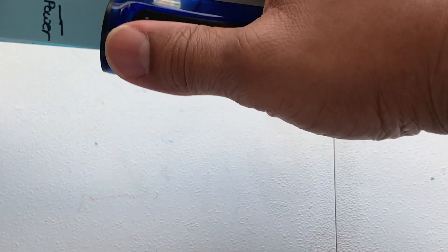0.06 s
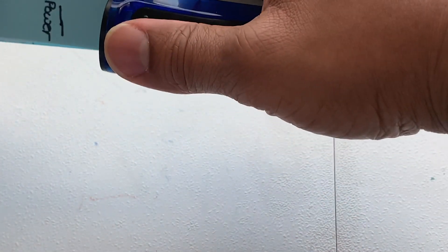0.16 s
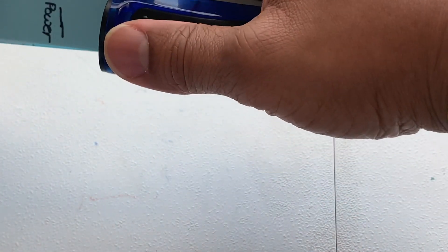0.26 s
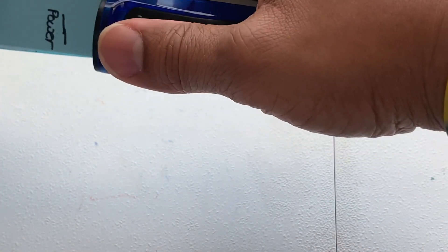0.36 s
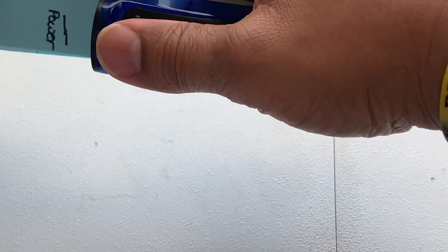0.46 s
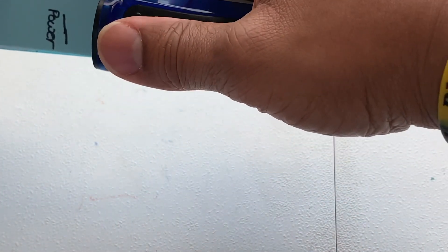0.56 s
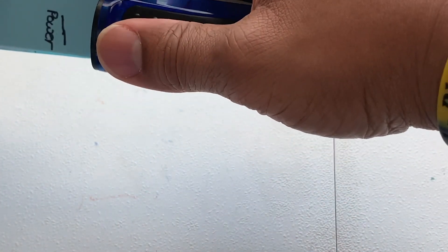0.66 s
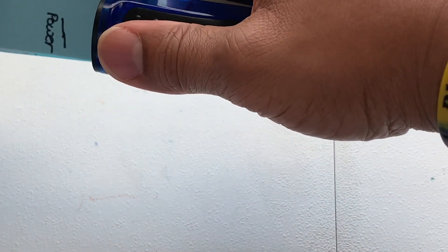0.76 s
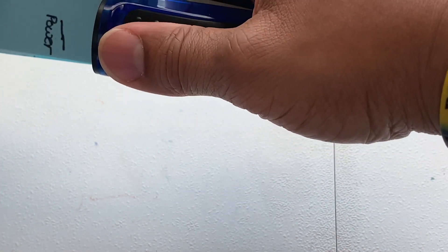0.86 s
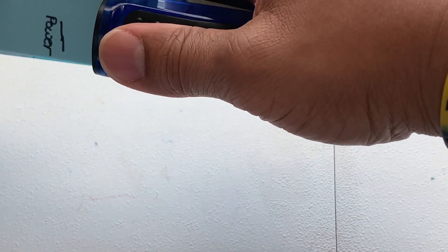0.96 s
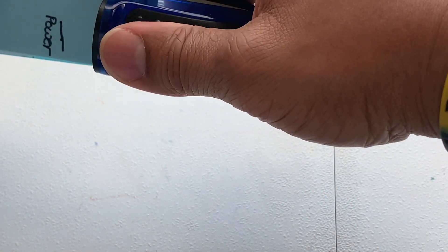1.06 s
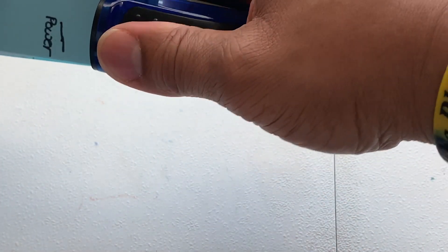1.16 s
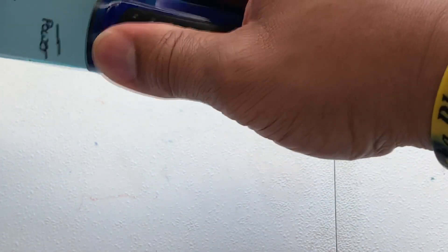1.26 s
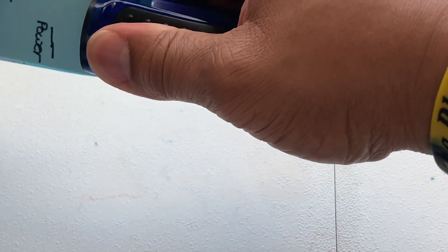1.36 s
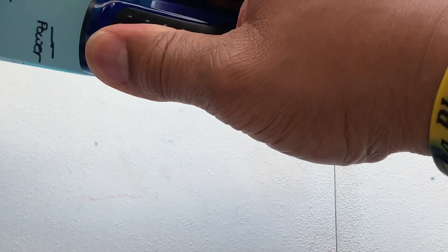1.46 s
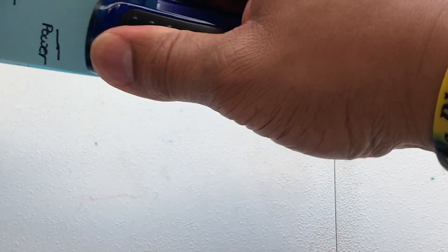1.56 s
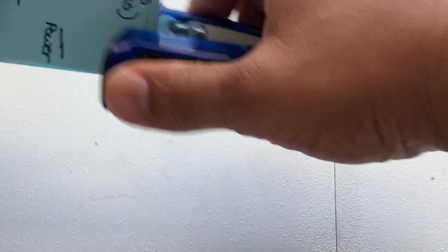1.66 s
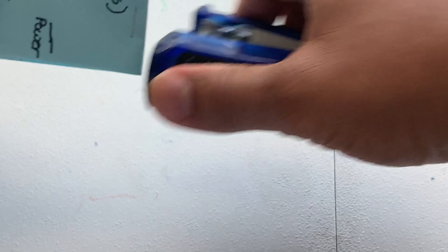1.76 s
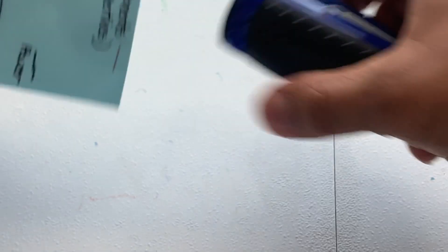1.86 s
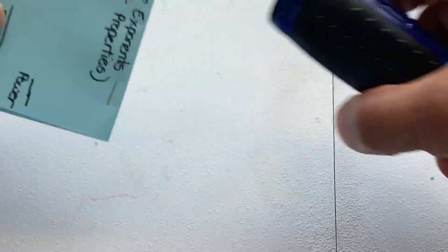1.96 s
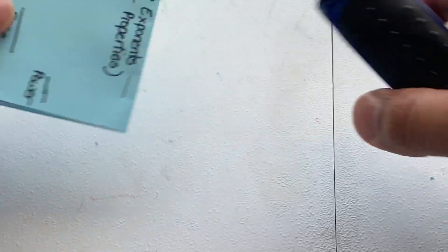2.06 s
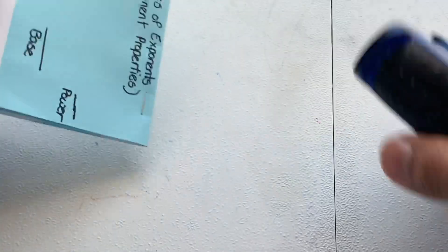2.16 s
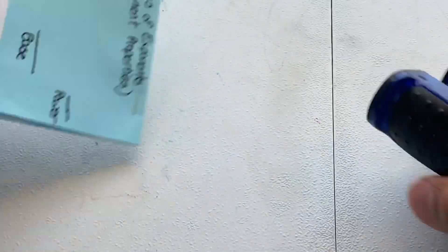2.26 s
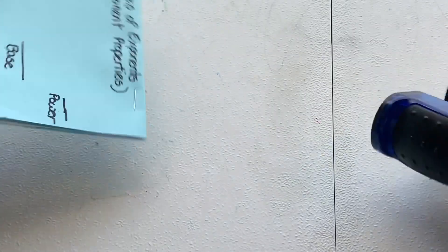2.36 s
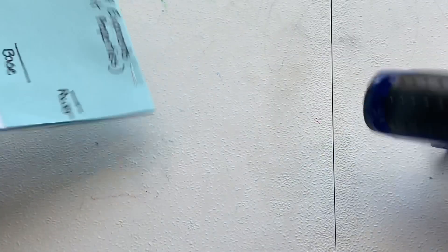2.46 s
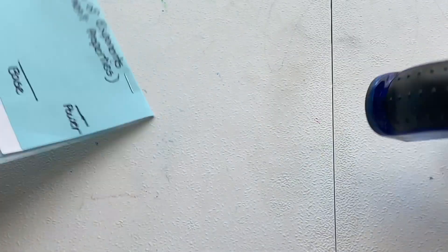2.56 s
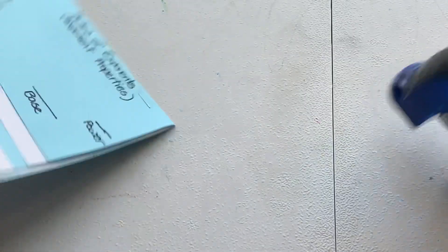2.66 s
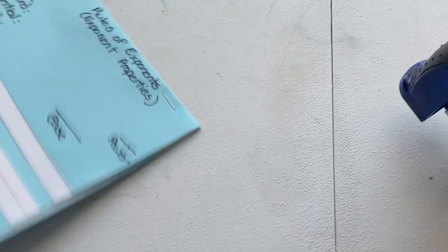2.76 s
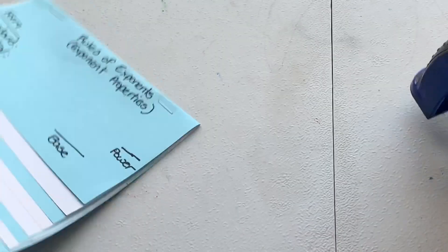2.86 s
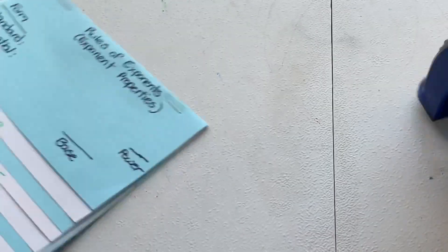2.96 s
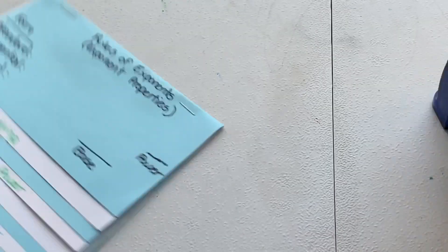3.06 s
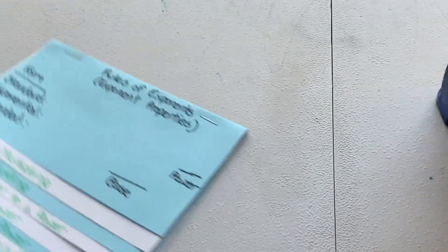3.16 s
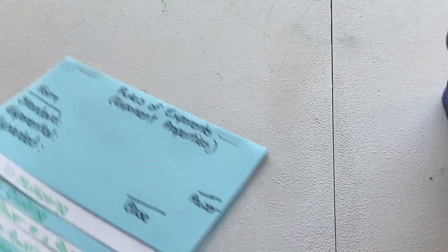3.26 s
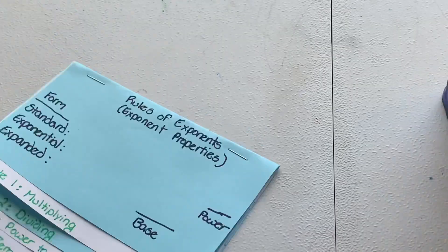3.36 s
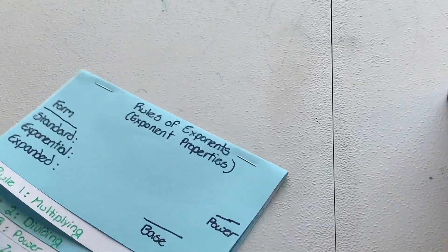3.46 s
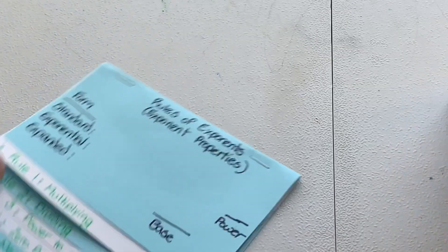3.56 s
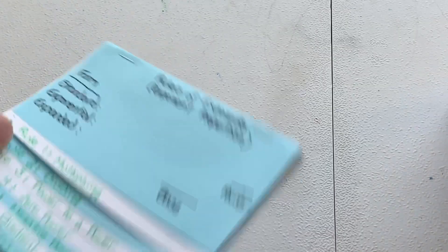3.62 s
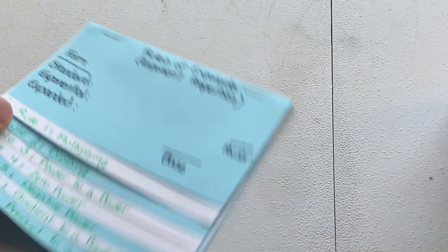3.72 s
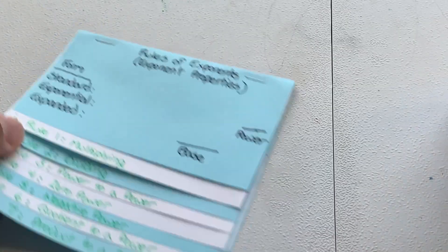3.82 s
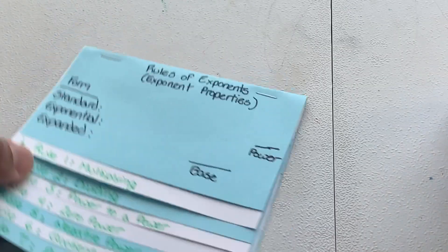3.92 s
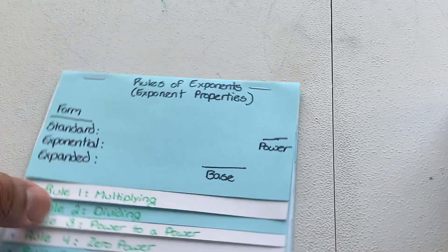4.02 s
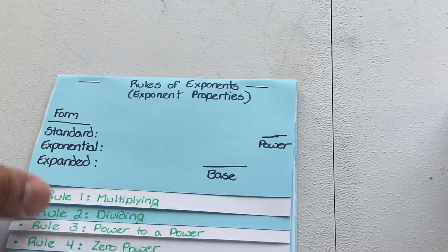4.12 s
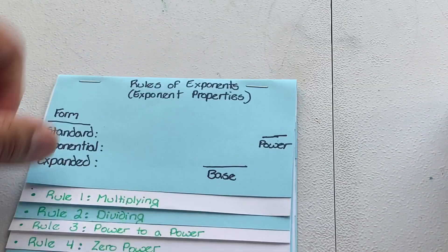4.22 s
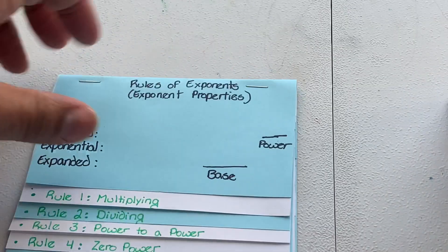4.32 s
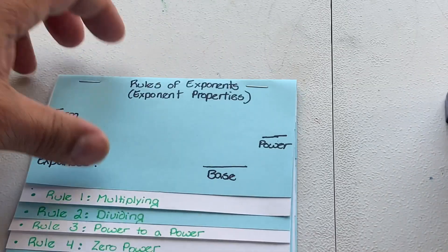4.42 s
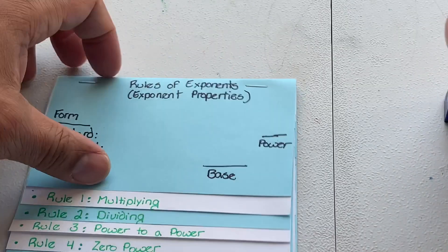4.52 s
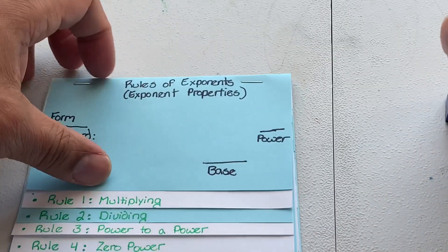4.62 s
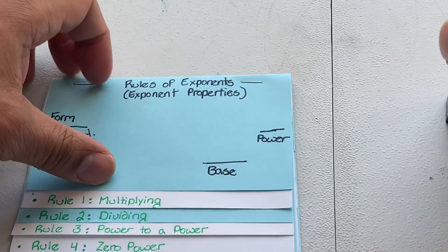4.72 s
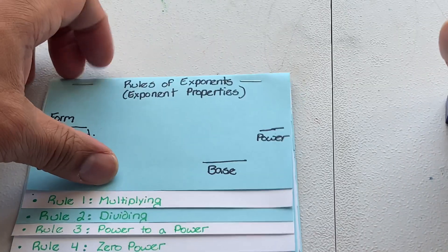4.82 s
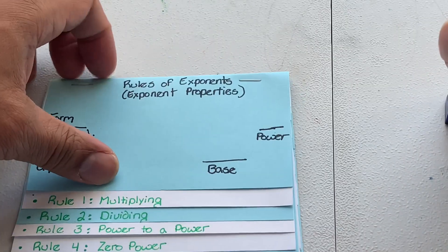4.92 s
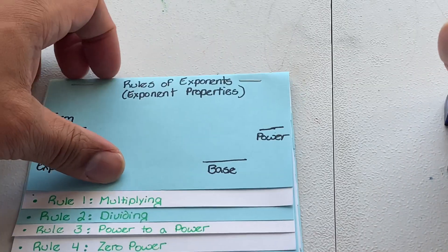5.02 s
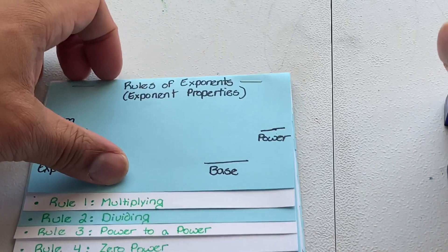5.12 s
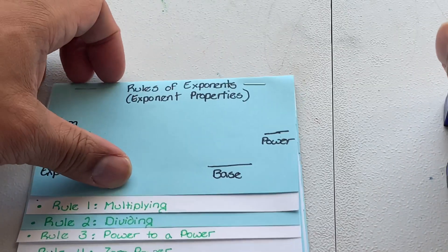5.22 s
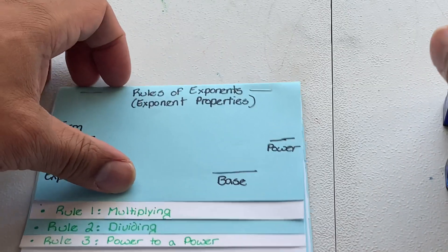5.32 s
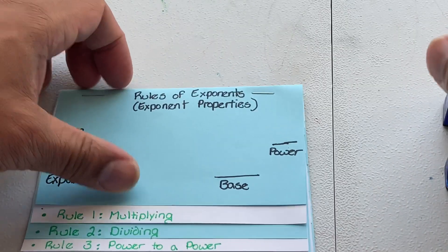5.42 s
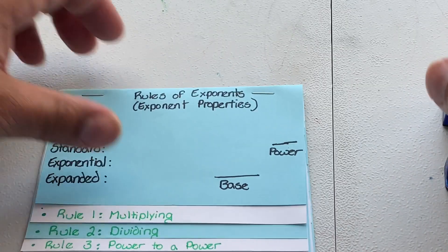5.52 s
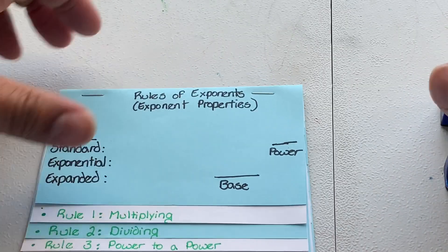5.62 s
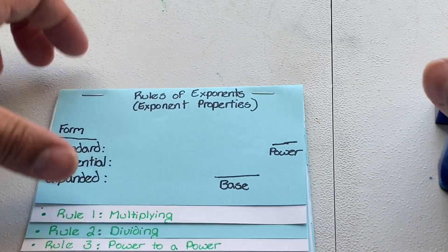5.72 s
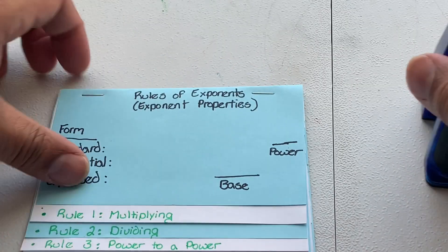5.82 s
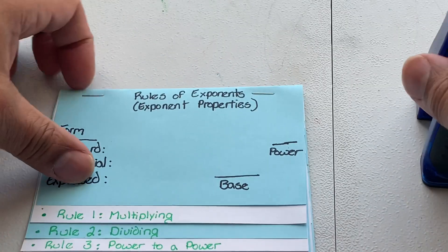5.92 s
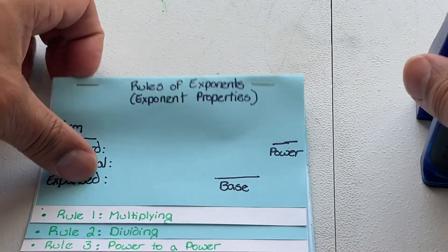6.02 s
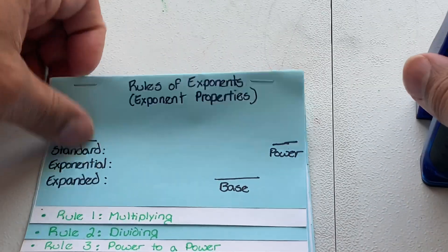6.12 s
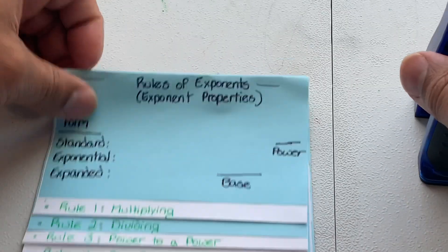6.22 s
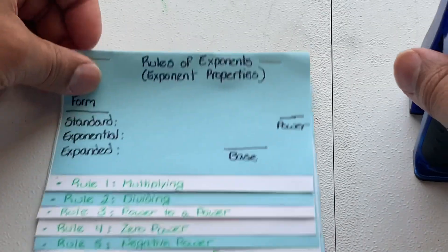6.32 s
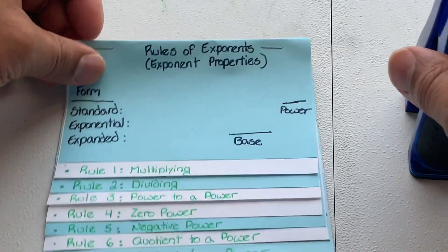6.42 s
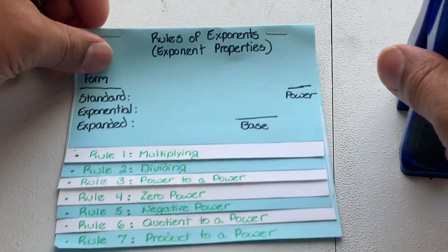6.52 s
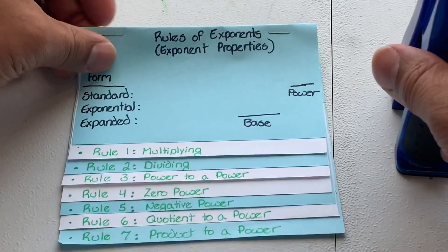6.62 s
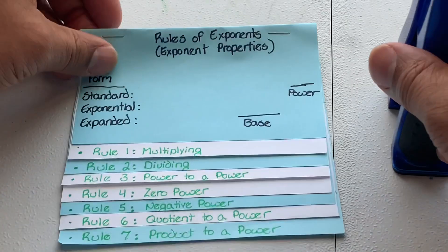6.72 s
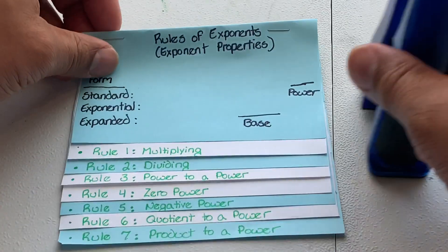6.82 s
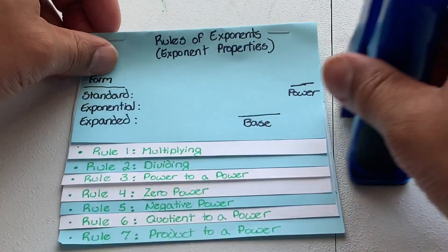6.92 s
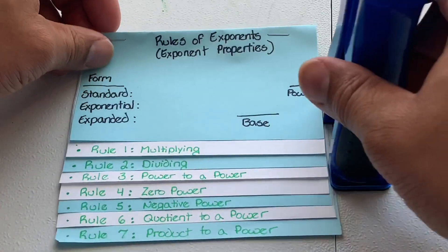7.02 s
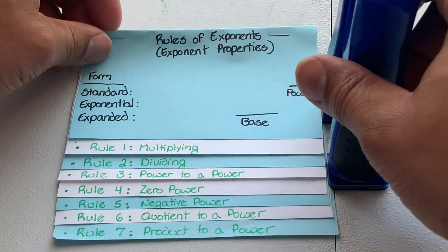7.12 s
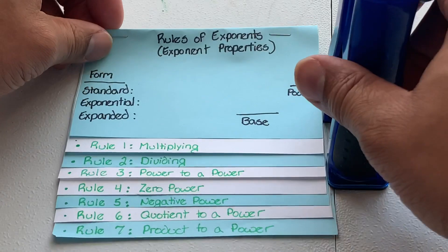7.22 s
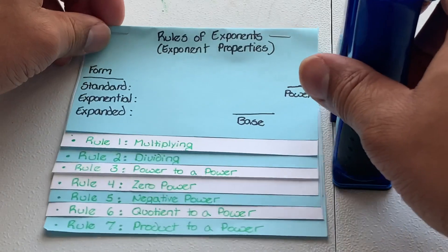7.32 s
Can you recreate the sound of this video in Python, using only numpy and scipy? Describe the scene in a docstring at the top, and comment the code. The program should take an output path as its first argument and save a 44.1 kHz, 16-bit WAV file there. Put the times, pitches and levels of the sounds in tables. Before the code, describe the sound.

Close by in a quiet, faintly rumbling room, a stapler bites into paper with a loud, rapid cluster of clacks and snaps open again. Several hollow knocks on the desk follow, mixed with the swish and tick of paper being slid around. The rest is softer: fingers tap the desktop and the paper shifts once more before the handling dies down.

```python
"""Paper rustles on a hollow desk; a hand-held stapler clacks through it and springs back, close by.
Metal blows ring the stapler's shell and steel parts, its arm thuds, its spring scrapes before release.
Paper then slides and ticks as fibres catch and slip, stapler and fingertips knock the desk's modes,
and the stapler sings faintly as it is dragged. A two-port microphone hears it all in a quiet,
rumbling room with a short echo."""
import sys
import numpy as np
from scipy import signal
from scipy.fft import rfft, irfft, next_fast_len
from scipy.io import wavfile
from scipy.ndimage import uniform_filter1d

SR = 44100
rng = np.random.default_rng(int(sys.argv[2]) if len(sys.argv) > 2 else 0)


def persist_wave(psi):
    """Save psi, clipped to +-1, as 16-bit WAV."""
    counts = np.round(np.clip(psi, -1, 1) * 32767).astype(np.int16)
    wavfile.write(sys.argv[1], SR, np.atleast_2d(counts).T)


N = 325458

# paper ticks and fingertip slaps: t/s, level/dB, tilt/(dB/oct), knock f/Hz, knock level/dB
TICKS = [(.465, -48, -7.5, 1410, 0.5), (0.548, -55.5, -19, 1400, 4), (1.917, -40, -4, 1820, -1),
         (2.038, -45, 6, 3134, 8), (2.316, -21, -5.5, 4250, -12), (2.46, -35.5, -6.5, 1450, -5),
         (2.658, -22.5, -3, 1960, -17), (2.758, -32.5, -4.5, 1570, -4), (3.01, -18, 0.5, 1590, -5.5),
         (3.236, -34, 0, 1920, -6), (3.246, -37, 9.5, 1830, 1), (3.304, -40, 2, 2350, -9),
         (3.597, -37, 11.5, 2000, 3), (3.612, -29.5, 8, 2090, -1), (3.630, -35, 6, 2160, -5),
         (3.675, -38, 9, 6940, 0), (3.728, -35, -1, 6740, 10), (3.841, -43, -17, 2020, -13),
         (3.995, -43.5, 0, 3680, -5), (4.066, -64, -1, 9000, 0), (4.258, -61, -4, 9000, 0),
         (4.392, -40, -4, 3700, -3.5), (4.42, -49, -15, 1410, -7), (4.472, -31.5, -11, 1510, -5.5),
         (4.514, -39, 3, 3520, 5), (4.629, -40, -3, 4180, 3), (4.715, -54, -1.5, 4060, 10),
         (4.899, -38, -7.5, 1646, -0.5), (5.415, -59, -9.5, 3220, 4), (5.723, -42.5, -7, 3470, -4.5),
         (5.741, -41, -14, 3150, -14), (5.754, -32, -14, 3350, -5), (5.826, -35.5, -9, 1640, -17),
         (6, -48.5, -9.5, 1515, -2.5), (6.119, -25.5, -0.5, 1784, -5.5), (6.193, -28, -8.5, 3270, 6),
         (6.755, -48.5, -3, 4150, -9), (7.086, -45, 4.5, 8500, -6.5), (7.226, -57, -10, 4245, 0)]
# stapler shell spectrum: f/Hz, level/dB
SHELL = [(400, -20.5), (750, -21.5), (1150, -8), (1900, -11), (2600, -2.5), (3200, -12), (4200, -6),
         (5400, -11.5), (8000, -9.5), (9800, -8.5), (11600, -8), (13200, -15), (15500, -13.5),
         (16800, -26.5)]
# modes of the free steel parts: f/Hz, level/dB, t60/s
STEEL = [(524, -17.5, 0.32), (1320, -12, .12), (1490.7, -4.5, 0.12), (2330, -5, 0.25), (2670, -7, .28),
         (4000, -12, .3), (8700, -5, .2), (9960, -14.5, .3), (10650, -17, 0.27)]


def gain_of(db):
    """dB to gain."""
    return 10 ** (np.asarray(db) / 20)


def unit_rms(x):
    """Scales to rms 1."""
    return x / np.sqrt(np.mean(x ** 2) + 1e-20)


def peaked(x, db):
    """Scales to a peak level."""
    return gain_of(db) * x / abs(x).max()


def read(points, hz):
    """Reads a table on a log-frequency axis."""
    f, value = np.transpose(points)
    return np.interp(np.log(hz + 1), np.log(f + 1), value)


def add(mix, s, sound):
    """Mixes a sound in at s seconds."""
    part = mix[round(s * SR):][:len(sound)]
    part += sound[:len(part)]


def coloured(x, gain):
    """Applies gain(hz) to the spectrum."""
    size = next_fast_len(x.shape[-1])
    return irfft(rfft(x, size) * gain(np.fft.rfftfreq(size, 1 / SR)), size)[..., :x.shape[-1]]


def ring(modes, seconds):
    """One decaying sine per row of f/Hz, level/dB, t60/s."""
    hz, db, t60 = np.transpose(modes)[:, :, None]
    t = np.arange(round(seconds * SR)) / SR
    return gain_of(db - 60 * t / np.maximum(t60, .001)) * np.sin(2 * np.pi * hz * t)


def dying(x, t60s):
    """Decays each band at its own rate; energy 1."""
    hz, t, z = signal.stft(x, SR, nperseg=128)
    tail = signal.istft(z * gain_of(-60 * t / read(t60s, hz)[:, None]), SR, nperseg=128)[1]
    return tail / np.linalg.norm(tail)


def arch(t, s, rise, fall):
    """A swell from 0 to 1 and back."""
    since_top = t - s - rise
    return np.cos(np.pi / 2 * np.clip(since_top / np.where(since_top < 0, rise, fall), -1, 1))


def burst(ms, tilt_db, knock_hz, knock_db, spiky_db):
    """A quick cluster of tiny impacts, tilted about 3 kHz, with one broad hollow note."""
    age = np.arange(2048) / SR * 1000 / max(ms, .2)
    hits = rng.standard_normal(2048) * gain_of(spiky_db * rng.standard_normal(2048))
    hits = hits * age * np.exp(-2 * age)
    padded = np.pad(hits, (256, 0))  # room for the filter's spread
    tilt = lambda hz: gain_of(tilt_db * np.log2((hz + 300) / 3000)) * hz / (hz + 500)
    click = coloured(padded, tilt)[256:]
    knock = signal.fftconvolve(hits, ring([(knock_hz, 0, 9 / knock_hz)], .02)[0])[:2048]
    return unit_rms(click) + gain_of(knock_db) * unit_rms(knock)


def air():
    """Low room rumble over a faint hiss, partly shared by the ports, and a wavering hum."""
    # room noise spectrum: f/Hz, level/dB
    spectrum = [(12, -52), (20, -24.5), (37, -4), (60, -6), (165, -13.5), (200, -18), (281, -21.5),
                (465, -37), (506, -49.5), (551, -43), (839, -50.5), (913, -46.5), (7100, -63.5),
                (13200, -59), (16500, -75.5)]
    # likeness of the ports: f/Hz, correlation
    likeness = [(50, .96), (150, .9), (380, .7), (950, .2), (2400, .1), (6000, .5), (15000, .75)]
    hum_hz, hum_db, noise_db = 58.1, -55, -49
    left, other, drift = rng.standard_normal((3, N))
    same = lambda hz: read(likeness, hz)
    right = coloured(left, same) + coloured(other, lambda hz: np.sqrt(1 - same(hz) ** 2))
    noise = coloured(np.array([left, right]), lambda hz: gain_of(read(spectrum, hz)))
    waver = unit_rms(coloured(drift, lambda hz: 1 / (1 + (hz / 3.5) ** 2)))
    phase = 2 * np.pi * np.cumsum(hum_hz + 2.7 * waver) / SR
    hum = gain_of(hum_db + 2.5 * waver[::-1]) * np.sqrt(2) * np.sin(phase)
    return (gain_of(noise_db) * unit_rms(noise) + hum) * gain_of([[.8], [-.8]])


def paper_motion(t):
    """Strokes swell and fade, ticks leave a dying rustle; pitch and tilt are power-weighted means."""
    # paper strokes: t/s, rise/s, fall/s, rustle level/dB, hiss level/dB, rasp f/Hz, tilt/(dB/oct)
    strokes = [(0.241, 0.056, 0.049, -69.5, -79, 2640, 7), (0.951, 0.044, 0.058, -68, -70, 2200, -4),
               (1.79, 0.067, 0.058, -67, -57.5, 2450, 2.5), (1.912, .018, 0.053, -55, -54, 2200, 0),
               (1.959, 0.035, 0.053, -62, -64.5, 2580, -1), (2.019, 0.03, 0.17, -55.5, -54, 2980, -3),
               (2.21, 0.055, 0.086, -55.5, -48.5, 2630, 3.5), (2.269, 0.044, 0.19, -58, -49.5, 2430, 0),
               (2.44, 0.054, 0.13, -64.5, -54.5, 1900, 0), (2.53, 0.069, 0.082, -59, -49, 2970, 5),
               (2.66, 0.05, 0.055, -51.5, -43, 2200, 3), (2.754, 0.03, 0.2, -55, -49, 2220, -1),
               (2.93, 0.065, 0.047, -57.5, -53, 2040, 6), (3.02, 0.061, 0.17, -56, -66, 2170, -5),
               (3.172, 0.064, 0.034, -57.5, -55, 1830, -8), (3.30, 0.035, 0.065, -48.5, -50.5, 2200, -10.5),
               (3.33, 0.082, 0.061, -53, -52.5, 2530, 1.5), (3.46, 0.091, 0.047, -56, -59, 2200, -7),
               (3.576, 0.044, 0.032, -49.5, -44.5, 2000, -14),
               (3.66, 0.065, 0.028, -46.5, -43.5, 1980, -9.5), (3.76, 0.098, 0.14, -62.5, -61.5, 2310, -4),
               (3.9, 0.094, 0.016, -56, -53.5, 2770, 1.5), (4.48, 0.04, 0.033, -66.5, -72, 3503, -11),
               (4.59, 0.038, 0.026, -68, -61.5, 3395, 1.5), (4.70, 0.0194, 0.033, -71, -81, 3950, -10),
               (4.98, .14, .15, -79, -84, 2513, 2), (5.28, 0.067, 0.049, -68, -73, 3290, -3),
               (5.45, 0.035, 0.038, -71, -92, 1606, -11), (5.789, 0.028, 0.18, -63, -73, 2650, 10),
               (6.012, 0.12, 0.036, -53, -45.5, 1900, 0.5), (6.139, 0.028, 0.19, -60, -55.5, 2720, -0.5),
               (6.268, 0.099, 0.057, -66.5, -59, 3270, 0), (6.409, 0.052, 0.1, -67, -63.5, 2743, -2.5),
               (6.59, 0.067, 0.075, -66.5, -66, 1965, 0), (6.68, 0.071, 0.055, -68.5, -67, 1960, -5),
               (6.8, 0.044, 0.075, -67.5, -78, 1967, 0), (6.93, 0.045, 0.16, -70, -77.5, 1964, 4),
               (7.21, .065, 0.059, -68, -77, 1966, 5)]
    sharpness = 1.53
    settle_t60_s, settle_db, settle_hiss_db, hiss_octaves = .19, -23.5, -29, 1.57
    s, rise, fall, db, hiss_db, rasp_hz, tilt_db = np.transpose(strokes)[:, :, None]
    swell = abs(arch(t, s, rise, fall)) ** (2 * sharpness)
    tick_s, tick_db, tick_tilt_db, knock_hz, _ = np.transpose(TICKS)[:, :, None]
    settle = (t > tick_s) * gain_of(2 * (tick_db - 60 * abs(t - tick_s) / settle_t60_s))
    sheet_power = np.concatenate([swell * gain_of(2 * db), settle * gain_of(2 * settle_db)]) + 1e-30
    edge_power = swell * gain_of(2 * hiss_db) + 1e-30
    settle_hiss = settle * gain_of(2 * (settle_hiss_db + hiss_octaves * tick_tilt_db))
    sheet_total = sheet_power.sum(0)
    edge_total = edge_power.sum(0) + settle_hiss.sum(0)
    mean_hz = (sheet_power * np.concatenate([rasp_hz, knock_hz])).sum(0) / sheet_total
    mean_tilt_db = (edge_power * tilt_db).sum(0) / edge_total
    return np.sqrt(sheet_total), np.sqrt(edge_total), mean_hz, mean_tilt_db


def paper_slide():
    """Fibres catch and slip in dense grains: the sheet rustles, its edge hisses, both with a rasp."""
    # sheet spectrum: f/Hz, level/dB
    rustle_spectrum = [(240, -28), (400, 5.5), (456, -17), (874, -4), (2260, -8.5), (2820, -6.5),
                       (5410, -8.5), (5860, -15), (6500, -15), (9000, -18), (11700, -40), (19800, -120)]
    # edge spectrum: f/Hz, level/dB
    hiss_spectrum = [(2650, -40), (4500, -12), (6090, -8), (6770, -3.5), (8690, -6.5), (9870, -4),
                     (11900, -5), (14700, -5.5), (16000, -9)]
    # rasp peaks: pitch ratio, sheet boost at zero tilt/dB
    rasp_peaks = [(1, 5), (2.2, 1), (3.2, 0.5)]
    clumps = unit_rms(uniform_filter1d(rng.standard_normal(N), 130))
    grains = rng.standard_normal((2, N)) * gain_of(.53 * clumps + 5.5 * rng.standard_normal(N))
    hz, frame_s, z = signal.stft(unit_rms(grains), SR, nperseg=256)
    hz = hz[:, None]
    sheet_gain, edge_gain, rasp_hz, tilt_db = paper_motion(frame_s)
    octaves = np.log2((hz + 1) / rasp_hz)
    rasp_db = sum(db * np.exp(-((octaves - np.log2(ratio)) / .2) ** 2) for ratio, db in rasp_peaks)
    rasp_db *= np.clip(1 - .16 * tilt_db, 0, 4)  # duller strokes rasp more
    flicker = uniform_filter1d(rng.standard_normal(z[0].shape), 4, axis=0)
    flicker_db = 2 * unit_rms(uniform_filter1d(flicker, 14, axis=1))
    sheet_db = read(rustle_spectrum, hz) + rasp_db
    edge_db = read(hiss_spectrum, hz) + .7 * rasp_db + tilt_db * np.log2((hz + 1000) / 9000)
    shape = gain_of(np.array([sheet_db, edge_db]) + flicker_db)
    shape /= np.sqrt((shape ** 2).mean(1, keepdims=True))
    rustle, hiss = signal.istft(z * shape, SR, nperseg=256)[1][:, :N]
    t = np.arange(N) / SR
    return np.interp(t, frame_s, sheet_gain) * rustle + np.interp(t, frame_s, edge_gain) * hiss


def paper_ticks():
    """Paper snaps and fingertips slap; harder slaps last longer."""
    out = np.zeros(N)
    for s, db, *timbre in TICKS:
        length_ms = 7.4 + .17 * db
        add(out, s, peaked(burst(length_ms, *timbre, spiky_db=3.5), db))
    return out


def desk_knocks():
    """A short push rings the desk top; bending waves bring the low modes in later than the high."""
    # knocks: t/s, level/dB, deep-mode gain/dB, upper-mode gain/dB
    knocks = [(.47, -40, 2, 6), (1.134, -25, -16.5, -1.5), (1.216, -36, 4.5, 12), (1.254, -29, 4, -13),
              (1.602, -33, -9.5, 4.5), (2.314, -16.5, -7, 4.5), (2.327, -19.5, -13.5, -4.5),
              (2.39, -28.5, -7, -5.5), (2.428, -24, 7.5, 7.5), (2.451, -23.5, -4.5, -3.5),
              (2.657, -8, -4.5, 0.5), (2.67, -15.5, 15, 12), (2.759, -32.5, 2, 10), (2.879, -30.5, 1.5, -2),
              (2.964, -28, 8, -11), (2.985, -16, 1, -4), (3.009, -14, -17, 4), (3.346, -36, -17, 14),
              (3.61, -27.5, -3, -9), (3.842, -33, 12, 32.5), (4.39, -36, -4, 4.5), (4.471, -18.5, -4, 0.5),
              (4.508, -27, -13, -14), (4.904, -28, -3.5, 1), (5.466, -41, -1.5, 1.5),
              (5.723, -36.5, -0.5, 14), (5.755, -20, 0.5, 2), (5.808, -30, -11, -4.5), (5.849, -29, -7, -3),
              (6.115, -37.5, -7, -0.5), (6.597, -40, 7.5, -14), (6.752, -29, -4, -1),
              (7.047, -30.5, -0.5, -6), (7.282, -33, 5.5, 2)]
    # desk modes: f/Hz, level/dB, base t60/s
    modes = [(76, -1.5, 0.18), (128, 3, .22), (154.36, -10.5, 0.18), (201.8, 0, 0.14), (262.6, -10.5, 0.16),
             (304.5, -12.5, 0.21), (374.6, -12.5, 0.094), (431.8, -18.5, 0.14), (498, -19.5, 0.16),
             (586, -26.5, 0.14), (705, -18.5, 0.043), (886.3, -20, .05), (1080, -20.5, 0.035),
             (1530, -30, .04)]
    grip_ends_s = 1.8
    hz, mode_db, t60_s = np.transpose(modes)
    deep, upper = hz < 180, hz > 235
    onset = 1 - np.exp(-np.arange(round(.6 * SR)) / SR * hz[:, None] / .76)
    signs = (-1.) ** np.arange(len(hz))
    out = np.zeros(N)
    for s, db, deep_db, upper_db in knocks:
        t60_scale = .29 if s < grip_ends_s else .99  # the squeezing hand damps the desk
        # each spot detunes and weights the upper modes differently
        spot_hz = hz * (1 + .03 * upper * rng.standard_normal(len(hz)))
        spot_db = 3.5 * upper * rng.standard_normal(len(hz))
        ringing = onset * ring(np.transpose([spot_hz, mode_db, t60_s * t60_scale]), .6)
        weights = signs * gain_of(deep_db * deep + upper_db * upper + spot_db)
        contact_ms = .45 - .028 * db  # harder knocks touch more briefly
        push = np.hanning(round(contact_ms * SR / 1000) + 2)
        add(out, s, peaked(signal.fftconvolve(push, weights @ ringing), db))
    return out


def stapler_contacts():
    """A hard blow is first touch, full contact and rebound; a light one is a single rattle."""
    # metal blows: t/s, level/dB, tilt/(dB/oct), knock f/Hz, knock level/dB
    blows = [(0.9874, -34.5, 2, 2300, -10), (1.1335, 0, 1, 1580, -6), (1.2178, -5, 0, 1050, 2),
             (1.2516, -4.5, -5, 1200, -4.5), (1.253, -3, 11.5, 2650, 0.5), (1.5664, -42.5, -3.5, 1173, 6),
             (1.5931, -21, -3, 8500, -5.5), (1.6044, -4, 1.5, 2670, 2.5), (1.6040, -10, -3, 1745, 6.5),
             (1.613, -17.5, -1.5, 8600, -9)]
    # first touch, rebound: delay/ms, gain/dB, length/ms, tilt/(dB/oct), knock f/Hz, knock level/dB
    touch = (-1.8, -4.5, 3, 2.5, 8201, -7)
    rebound = (4, -2.5, 0.36, 2.5, 2599.5, -6.5)
    hard_db, hard_ms, light_ms = -10, 1.3, 2.55
    contacts = []
    for s, db, *timbre in blows:
        contacts.append((s, db, hard_ms if db > hard_db else light_ms, *timbre))
        if db > hard_db:
            for delay_ms, gain_db, *rattle in (touch, rebound):
                contacts.append((s + delay_ms / 1000, db + gain_db, *rattle))
    return contacts


def stapler_clacks():
    """Each blow shakes the gripped shell's dense modes and leaves steel parts ringing faintly."""
    # shell decay: f/Hz, t60/s
    shell_decay = [(800, 0.071), (2500, 0.065), (8000, 0.081), (15000, 0.017)]
    shell_db, steel_db = -6, -42
    steel = ring(STEEL, .5).sum(0)
    out = np.zeros((2, N))
    for s, db, *rattle in stapler_contacts():
        shared, left, right = rng.standard_normal((3, 6000))
        sides = shared + .41 * np.array([left, right])  # each port faces another side of the shell
        body = gain_of(shell_db) * dying(sides, shell_decay)
        body[:, 0] += 1  # the bare contact
        hit = np.pad(burst(*rattle, spiky_db=1.5), (1024, 0))
        shaken = signal.fftconvolve(hit[None], body, axes=1)
        clack = coloured(shaken, lambda hz: gain_of(read(SHELL, hz)))[:, 1024:]
        add(out.T, s, peaked(clack, db).T)
        add(out.T, s, gain_of(db + steel_db) * steel[:, None] * rng.choice([-1, 1]))
    return out


def arm_thuds():
    """The arm bottoms out in the hand: a dull thud of falling pitch."""
    # thuds: t/s, level/dB, start f/Hz, end f/Hz, t60/s
    thuds = [(1.134, -12.5, 391, 191, 0.013), (1.217, -15.5, 420, 198.4, 0.0087),
             (1.2535, -14, 298, 90, 0.022), (1.606, -33.5, 414, 259, 0.068)]
    glide_s, attack_s = .0095, .0015
    t = np.arange(4000) / SR
    out = np.zeros(N)
    for s, db, start_hz, end_hz, t60_s in thuds:
        hz = end_hz + (start_hz - end_hz) * np.exp(-t / glide_s)
        envelope = gain_of(-60 * t / t60_s) * (1 - np.exp(-t / attack_s))
        add(out, s, peaked(-np.sin(2 * np.pi * np.cumsum(hz) / SR) * envelope, db))
    return out


def spring_scrape():
    """The spring drags before it lets go, brightening as it speeds up."""
    # scrape envelope: t/s, level/dB
    envelope = [(1.566, -73), (1.575, -53.5), (1.585, -39.5), (1.591, -42.5), (1.603, -39.5)]
    s, db = np.transpose(envelope)
    t = np.arange(s[0], s[-1], 1 / SR)
    bright = unit_rms(coloured(rng.standard_normal(len(t)), lambda hz: gain_of(read(SHELL, hz))))
    dull = unit_rms(coloured(bright, lambda hz: 1 / (1 + (hz / 3000) ** 2)))
    share = np.linspace(0, 1, len(t))
    out = np.zeros(N)
    add(out, s[0], gain_of(np.interp(t, s, db)) * (share * bright + (1 - share) * dull))
    return out


def stapler_drag():
    """Friction under the base stirs the damped steel parts."""
    # drags over the desk: t/s, rise/s, fall/s, level/dB
    drags = [(1.7, 0.27, .5, -69), (6.249, 0.17, 0.21, -75), (6.5, 0.21, 0.23, -71), (6.8, 0.18, 0.19, -77),
             (7.15, .12, 0.16, -74)]
    # drive of each steel mode: level/dB
    drive_db = [-12, -3, -7, -3, -3, 0, -9, -12, -15]
    t60_s = .007
    t = np.arange(N) / SR
    steel = ring([(hz, db, t60_s) for (hz, *_), db in zip(STEEL, drive_db)], .1).sum(0)
    friction = rng.standard_normal(N) * gain_of(3 * rng.standard_normal(N))
    envelope = sum(gain_of(db) * arch(t, *timing) for *timing, db in drags)
    return envelope * unit_rms(signal.oaconvolve(friction, steel)[:N])


def ports(x, phase, balance):
    """One sound at two microphone ports, differing in phase and level."""
    side = np.array([[.5], [-.5]])
    return coloured(x, lambda hz: gain_of(side * read(balance, hz)) * np.exp(1j * side * read(phase, hz)))


def room(x):
    """Short echo: sparse reflections of random sign, each band dying at its own rate."""
    # room decay: f/Hz, t60/s
    decay = [(150, 0.63), (500, 0.47), (1200, 0.33), (2600, 0.26), (4500, 0.46), (7000, 0.31),
             (10000, 0.37), (13000, 0.27), (16000, 0.73)]
    correlation = .6  # the ports lie close together
    taps = np.zeros((2, SR))
    at = np.arange(200, SR - 20, 20) + rng.integers(0, 20, (2, (SR - 201) // 20))
    np.put_along_axis(taps, at, rng.choice([-1., 1.], at.shape), 1)
    taps[1] = correlation * taps[0] + np.sqrt(1 - correlation ** 2) * taps[1]
    return signal.fftconvolve(x[None], dying(taps, decay), axes=1)[:, :N]


def scene():
    """Stapler, paper and desk close by, their echoes, and the room air."""
    # port differences per source, two tables each: f/Hz, left lead/rad; f/Hz, left minus right/dB
    stapler_ports = [(0, -1.5), (1500, 0.65), (2600, -2.1), (3800, -1.2), (4800, -2.5), (6000, 2),
                     (8000, 1), (12500, 0.5), (16000, 0.5)], [(60, 4.5), (110, -0.5), (200, 5), (380, 3.5),
                     (700, 3.5), (1290, 1.0), (2380, -1), (4400, 4), (8120, 1.5), (15000, -0.5)]
    paper_ports = [(0, 1.5), (1500, 1.45), (3500, -1.52), (5300, 2.5), (6900, -2), (9000, 0.75),
                   (16000, -1.8)], [(60, 1.5), (110, 1.0), (200, 2.2), (380, 1.5), (700, -2.1),
                   (1290, 0.58), (2380, -2), (4400, 2.2), (8120, 1.3), (15000, -0.47)]
    stapler = stapler_clacks() + arm_thuds() + spring_scrape() + stapler_drag()
    paper = paper_slide() + paper_ticks()
    desk = desk_knocks()
    near = ports(stapler, *stapler_ports) + ports(paper, *paper_ports) + desk * gain_of([[.6], [-.6]])
    echo = room(gain_of(-14.5) * stapler.mean(0)) + room(gain_of(-6.5) * paper + gain_of(-4) * desk)
    return near + echo + air()


def record(dry):
    """Low cut, microphone colour, soft clipping of the loudest peaks, then the band limit."""
    # port resonance: f/Hz, gain/dB
    resonance = [(5500, -1.03), (7300, -1.5), (8800, 2), (10500, -1.28)]
    low_cut_hz, ceiling, high_cut_hz = 42, .93, 16300
    thin = signal.sosfilt(signal.butter(2, low_cut_hz, "high", fs=SR, output="sos"), dry)
    heard = coloured(thin, lambda hz: gain_of(read(resonance, hz)))
    clipped = heard / (1 + (abs(heard) / ceiling) ** 6) ** (1 / 6)
    lowpass = signal.firwin(255, high_cut_hz, window=("kaiser", 9), fs=SR)
    return signal.oaconvolve(clipped, lowpass[None], "same")


dry = scene()
out = record(dry)
persist_wave(out)
```